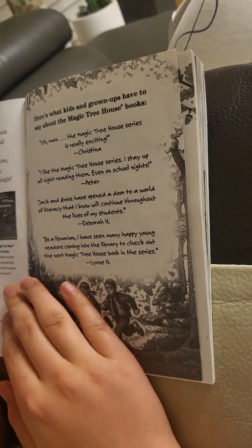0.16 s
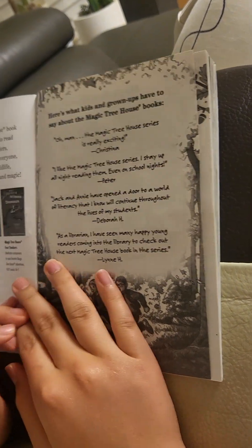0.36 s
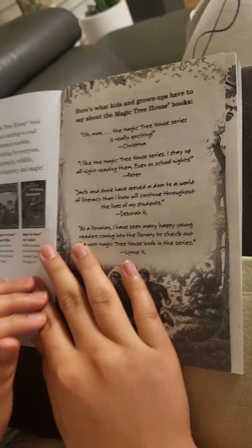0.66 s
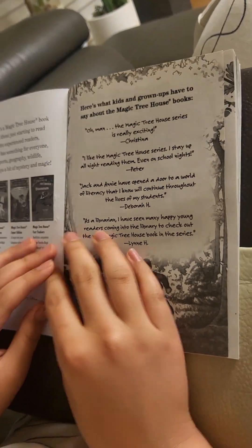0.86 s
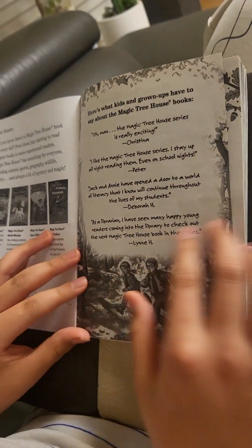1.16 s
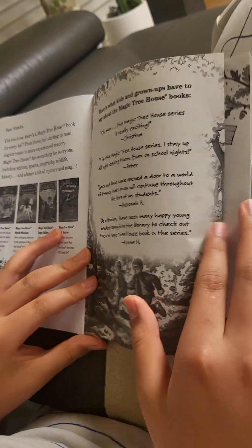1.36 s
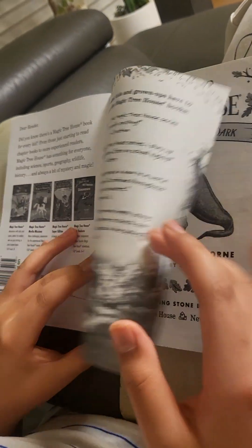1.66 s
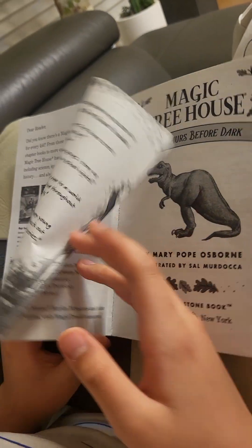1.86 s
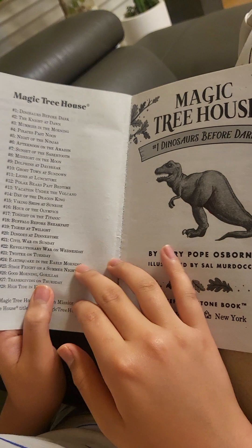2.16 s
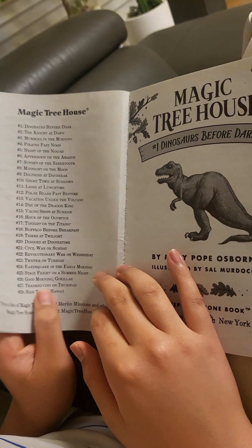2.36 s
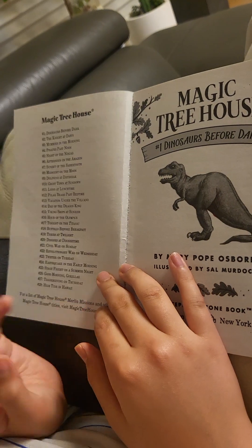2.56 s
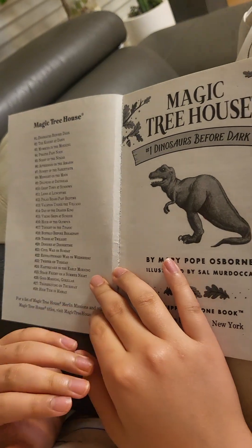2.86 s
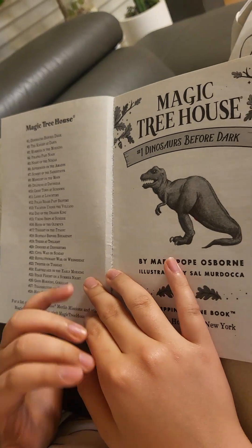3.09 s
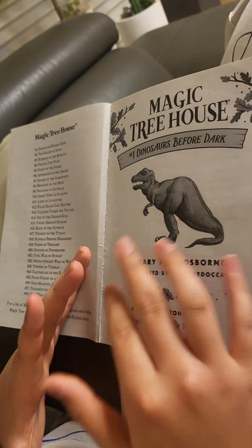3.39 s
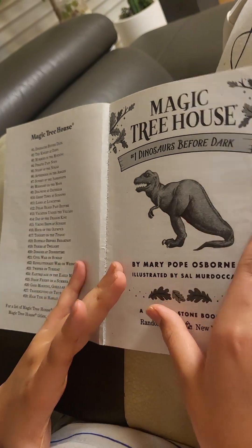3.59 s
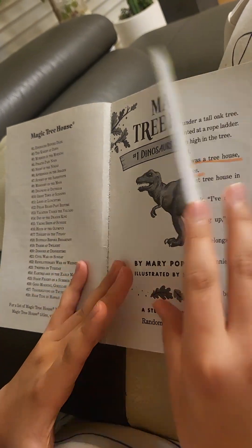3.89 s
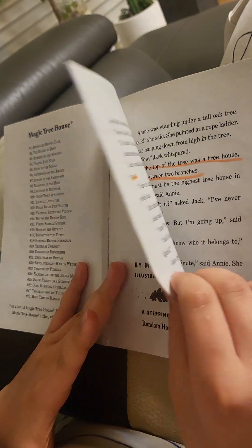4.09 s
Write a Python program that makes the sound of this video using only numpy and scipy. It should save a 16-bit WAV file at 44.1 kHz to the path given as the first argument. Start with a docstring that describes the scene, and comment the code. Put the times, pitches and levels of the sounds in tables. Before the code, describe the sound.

Hands smooth a paperback with dry papery rubs, then turn a page with crisp crackles and snaps, over a faint low hum.

```python
"""Paperback and turning page

Hands smooth a paperback on a sofa, close by, and turn a page; a second page starts to lift at the end.
Strokes are filtered noise: low skin drag, sheet rub, dry hiss. Snaps are short noise cracks, buckles grainy runs,
bumps decaying sines with a dull puff. Lap friction and fingertip touches are noise and thuds.
A wavering sine hums over faint air noise; snaps, buckles and bumps get a short room tail."""
import sys
import numpy as np
from scipy import signal
from scipy.fft import rfft, irfft, next_fast_len
from scipy.io import wavfile
from scipy.ndimage import map_coordinates

SR = 44100
rng = np.random.default_rng(int(sys.argv[2]) if len(sys.argv) > 2 else 0)


def waveform_to_disk(signal):
    """Save audio, clipped to [-1, 1], as 16-bit WAV at the path in sys.argv[1]."""
    frames = np.transpose(np.atleast_2d(signal))
    scaled = np.clip(frames, -1, 1) * 32767
    samples = np.round(scaled).astype(np.int16)
    wavfile.write(sys.argv[1], SR, samples)


N = 186631

# All levels are gains before panning.
# sliding strokes: start_s, push_s, coast_t60_s, rub_db, hiss_over_rub_db
STROKES = [(0.333, 0.023, 0.15, -51.5, 6.5), (.438, 0.038, 0.67, -33.5, -3.5), (0.62, .034, 0.85, -47, -9),
           (.771, 0.1, 2.2, -57, 7), (.968, 0.18, .33, -52.5, 5), (1.221, 0.048, 0.11, -58.5, 9.5),
           (1.339, 0.063, 0.32, -42.5, -1), (1.439, 0.039, 0.76, -33, -0.5), (1.716, 0.039, .36, -47.5, 5),
           (1.871, 0.06, 1.3, -51.5, 5), (1.907, 0.018, 0.38, -45.5, 9), (2.079, 0.064, 0.47, -51, 3),
           (2.14, 0.12, 1.9, -44.5, 5), (2.492, 0.019, 0.66, -35.5, -3), (2.633, 0.035, 2.1, -44, -2),
           (2.739, 0.053, .33, -48, 8), (2.833, 0.03, 0.31, -43, 3), (2.974, 0.082, 0.57, -47.5, -5),
           (3.19, 0.15, 0.24, -51.5, -2.5), (3.29, 0.047, 0.46, -42, -1.5), (3.415, 0.1, 0.74, -49.5, -1.5),
           (3.594, 0.02, 0.47, -44.5, 2.5), (3.884, 0.025, 1.4, -44, -3.5), (3.93, 0.14, 1.6, -47, -2),
           (4.145, 0.042, 0.24, -62, 15.5)]
# book shifting in the lap: time_s, level_db
HANDLING = [(0.0, -38), (0.14, -44.5), (1.38, -54), (2.06, -46), (2.34, -47), (2.83, -57.5), (3.29, -53.5),
            (3.55, -59.5), (4.23, -55.5)]
# sheet snaps and nail ticks: start_s, face_db, edge_db, face_pitch_hz
SNAPS = [(.0144, -25.5, -44, 1190), (0.0446, -30.5, -33, 2370), (.126, -32, -34.5, 1600),
         (0.142, -39, -39, 2160), (.1503, -40, -54, 875), (.1966, -44, -49, 2400), (0.415, -54, -45, 2000),
         (.43, -37.5, -32.5, 2260), (0.857, -34.5, -29.5, 2320), (1.3439, -33.5, -31, 2510),
         (1.444, -26, -32, 3260), (1.7312, -42, -40, 2250), (1.825, -25.5, -62, 1870),
         (1.85, -15.5, -12, 2260), (1.965, -21, -25, 2980), (1.9981, -17.5, -21.5, 1960),
         (2.108, -39, -37.5, 2040), (2.147, -28.5, -56, 1300), (2.1993, -17.5, -34, 1470),
         (2.2764, -28, -30, 1280), (2.3096, -15.5, -8.5, 1380), (2.3367, -12.5, -13.5, 1760),
         (3.2003, -47.5, -59, 1390), (3.2277, -42, -45, 1470), (4.0899, -30, -49, 1780)]
# runs of tiny creases: peak_s, level_db, swell_length_s, face_pitch_hz
BUCKLES = [(0.048, -29.5, 0.095, 1020), (.086, -36, 0.056, 1970), (0.14, -40.5, 0.14, 850),
           (1.752, -42, 0.043, 1070), (1.854, -15.5, 0.053, 2920), (1.954, -21, 0.13, 2230),
           (1.998, -27, 0.061, 1760), (2.311, -35, 0.17, 1180), (2.34, -25.5, 0.066, 1960)]
# soft blows on the page block: start_s, level_db, pitch_hz
BUMPS = [(.0373, -21, 660), (0.05, -20.5, 168), (.078, -28.5, 195), (0.1168, -23, 600), (.144, -24.5, 218),
         (.1496, -21, 840), (0.445, -28.5, 202), (.552, -31, 169), (.674, -35, 322), (0.7, -36.5, 350),
         (.856, -30, 231), (1.195, -41, 186), (1.335, -31, 338), (1.3438, -31.5, 189), (1.392, -31.5, 210),
         (1.442, -32, 204), (1.73, -29, 189), (1.851, -29, 262), (1.953, -26.5, 312), (1.968, -20, 166),
         (2.109, -30.5, 150), (2.146, -36, 202), (2.284, -29, 242), (2.316, -26.5, 173), (3.229, -40, 306)]
# hum drift: time_s, level_db
HUM_DRIFT = [(0.2, -51.5), (0.35, -50.5), (1.55, -46), (1.89, -51.5), (2.86, -49.5), (4.15, -52.5)]

# skin drag spectrum: freq_hz, relative_db
DRAG_SPECTRUM = [(200, -18), (450, -2), (900, 0), (1300, -1), (2000, -18), (4000, -60)]
# sheet-on-sheet rub spectrum: pitch_multiple, relative_db
RUB_SHAPE = [(.3, -28.5), (.55, -6.5), (.8, 0), (1.1, 2.5), (1.5, -4.5), (2, -5.5), (2.7, -10), (4, -41)]
# fibre hiss spectrum before tilt: freq_hz, relative_db
HISS_SPECTRUM = [(3000, -7), (5000, -10), (6000, -1), (7600, 2), (9000, -1), (10500, 0.5), (12300, -2),
                 (14000, -3), (16000, -3.5)]
# snap face spectrum: pitch_multiple, relative_db
SNAP_FACE_SHAPE = [(.12, -26), (.45, -1), (1, 5.5), (1.4, 3), (2, -11), (3.2, -16), (4.6, -26), (9, -13)]
# snap edge spectrum: freq_hz, relative_db
SNAP_EDGE_SPECTRUM = [(2500, -15), (5000, 1), (6200, -4), (7300, 2.5), (8700, 5), (10500, -7.5),
                      (12500, 1.5), (13800, -11), (14800, -1), (16000, -14)]
# crease face spectrum: pitch_multiple, relative_db
CREASE_FACE_SHAPE = [(.08, -32), (.27, -3.5), (.6, -4.5), (1, -0.5), (1.5, -3.5), (2, -8.5), (2.7, -16.5),
                     (5, -19)]
# crease edge spectrum: freq_hz, relative_db
CREASE_EDGE_SPECTRUM = [(2500, -37), (5000, -6), (6200, -28), (7200, 17), (8600, 4), (10500, 4.5),
                        (12500, -2), (14000, -22), (16000, -11)]
# lap friction spectrum: freq_hz, relative_db
LAP_SPECTRUM = [(25, -48), (60, 4), (110, -2), (190, -1.5), (300, -5), (450, -12.5), (900, -21),
                (3000, -90)]
# room air spectrum: freq_hz, relative_db
AIR_SPECTRUM = [(20, -53), (45, 0), (65, -21), (90, -10), (200, -3.5), (500, -21.5), (2000, -17),
                (6000, -23.5), (16000, -30)]
# rumble around the hum: freq_hz, relative_db
RUMBLE_SPECTRUM = [(60, -22), (100, -16.5), (116, -27), (128, 15), (145, -4), (240, -30)]
# room decay: freq_hz, t60_s
ROOM_DECAY = [(150, 0.066), (1000, 0.46), (4000, 0.33), (14000, 0.045)]
# open-book resonances: freq_hz, width_hz, gain_db
BOOK_MODES = [(734, 14, -4), (1450, 180, -12), (1860, 19, -25), (2477, 28, -10), (3650, 27, -5),
              (4080, 130, -12), (4465, 46, -2.5), (4860, 77, -3.5), (8570, 130, -14), (12140, 350, -8.5)]
# likeness of the two microphone ports, small close source: freq_hz, correlation
SPOT = [(60, 0.79), (250, 0.97), (600, 0.7), (950, 1), (1250, -0.045), (1800, -0.057), (2400, -0.1),
        (3400, -0.12), (4600, 0.91), (6000, 0.1), (16000, 0.23)]
# likeness of the two microphone ports, broad surface: freq_hz, correlation
BROAD = [(300, 0.97), (520, -0.29), (800, 0.67), (1000, 0.12), (1400, -0.32), (2100, -0.11), (2600, 0.063),
         (3800, -0.023), (8000, -0.02)]

HUM_HZ, HUM_WAVER_DB = 119.8, 1.3
TOUCHES_PER_S, TOUCH_DB, TOUCH_SCATTER_DB, TOUCH_HZ = 6.4, 4.5, 3, 254  # level over the shifting
# snap decay at HARD_SNAP_DB; doubles for each SNAP_DOUBLING_DB softer
SNAP_T60_S, HARD_SNAP_DB, SNAP_DOUBLING_DB = 0.011, -14, 18.5
JOLT_DB, JOLT_HZ, JOLT_T60_S = -13.5, 474, 0.075  # level over the snap's face
LEAN_DB, EDGE_LEAN_DB = 7, 12.5  # right over left: book lies right, its edge closest
BUMP_CYCLES = 12.9  # puff t60 in cycles
BUILD_SHARE = 0.42  # part of a run's swell before its peak
CREASES_PER_S, CREASE_DB, CREASE_DECAY_S = 240, 0.5, 0.0006  # bigger creases
GRAIN_PEAK_CAP = 2.7  # multiple of rms, keeps the crackle even
QUICK_RUN_S, CRISP_DB, CRISP_DB_PER_DOUBLING = 0.041, -9.5, -18  # edge over face; longer runs are duller
FLUTTER_DELAY_S, FLUTTER_DB, FLUTTER_S, FLUTTER_PITCH_RATIO = 0.019, -18, 0.13, 0.52
GRIP_SHARE = 0.45  # part of a push spent gathering speed
SNAGS_PER_S, SNAG_DB, SNAG_DECAY_S = 45, 2, 0.00064  # coarse fibres
TURN_S = 2.1  # page has turned
DRAG_BEFORE_DB, DRAG_AFTER_DB = -7.5, -12.5  # over the rub: page on top grips more before the turn
RUB_HZ, RUB_OCTAVES_PER_DB = 2500, 0.08  # lighter, hissier touch rubs higher
ROLLOFF_START_HZ = 15850


def amp(db):
    """Decibels to gain."""
    return 10 ** (np.asarray(db) / 20)


def unit(x):
    """Scale to rms 1."""
    return x / np.sqrt(np.mean(x ** 2) + 1e-20)


def along(points, hz):
    """Interpolate (freq_hz, value) points on a log frequency axis."""
    f, v = np.transpose(points)
    return np.interp(np.log(hz + 1), np.log(f), v)


def drift(rows):
    """Interpolate (time_s, value) rows at every sample."""
    time_s, value = np.transpose(rows)
    return np.interp(np.arange(N) / SR, time_s, value)


def wobble(knots_per_s):
    """Smooth random curve through Gaussian knots."""
    knots = rng.standard_normal(int(N * knots_per_s / SR) + 4)
    return map_coordinates(knots, [np.arange(N) * knots_per_s / SR])


def coloured(x, spectrum):
    """Minimum-phase filter with the given spectrum."""
    n = x.shape[-1]
    m = 2 * next_fast_len(n // 2 + 2048, True)
    cepstrum = irfft(np.log(amp(along(spectrum, np.fft.rfftfreq(m, 1 / SR)))))
    # fold onto positive times: causal response
    cepstrum[1:m // 2] *= 2
    cepstrum[m // 2 + 1:] = 0
    return irfft(rfft(x, m) * np.exp(rfft(cepstrum)), m)[..., :n]


def pair(alike, size):
    """White noise at two ports with frequency-dependent correlation."""
    m = next_fast_len(size, True)
    common, opposed = rfft(rng.standard_normal((2, m)))
    correlation = np.clip(along(alike, np.fft.rfftfreq(m, 1 / SR)), -1, 1)
    angle = np.arccos(correlation) / 2
    both = np.cos(angle) * common + np.sin(angle) * np.array([opposed, -opposed])
    return irfft(both, m)[:, :size]


def panned(x, right_db):
    """Raise right over left by right_db, split evenly."""
    return x * amp([[-right_db / 2], [right_db / 2]])


def burst(envelope, spectrum, alike):
    """Filtered noise under an envelope, at the envelope's rms."""
    noise = coloured(envelope * pair(alike, len(envelope)), spectrum)
    return unit(noise) * np.sqrt(np.mean(envelope ** 2))


def dying(t, t60_s):
    """Exponential decay, 60 dB in t60_s."""
    return np.exp(-np.log(1000) * t / max(t60_s, 1e-3))


def pitched(shape, hz):
    """Place a spectrum shape at a pitch."""
    return [(multiple * hz, db) for multiple, db in shape]


def tilted(spectrum, db_per_octave):
    """Tilt a spectrum about its lowest point."""
    return [(hz, db + db_per_octave * np.log2(hz / spectrum[0][0])) for hz, db in spectrum]


def catches(t, grain_db, size):
    """Fibres catch and slip: strength jumps every size samples."""
    steps_db = grain_db * rng.standard_normal(len(t) // size + 1)
    return unit(amp(np.repeat(steps_db, size)[:len(t)]))


def spikes(t, per_s, db, decay_s):
    """Unit gain with brief decaying jumps at random moments."""
    hits = rng.random(len(t)) < per_s / SR
    jump = np.exp(-np.arange(SR // 200) / SR / max(decay_s, 1e-4))
    return 1 + (amp(db) - 1) * np.convolve(hits, jump)[:len(t)]


def add(track, start_s, sound):
    """Mix a sound into the track, trimmed at both ends."""
    start = round(start_s * SR)
    part = sound[:, max(-start, 0):max(N - start, 0)]
    track[:, max(start, 0):][:, :part.shape[1]] += part


def thud(hz, puff_t60_s):
    """Push on the damped page block: a few sine cycles and a dull noise puff."""
    t = np.arange(SR // 5) / SR
    push = dying(t, puff_t60_s) * (1 - np.exp(-t / 0.0014))
    dull = [(hz / 8, -20), (hz / 1.96, -4), (hz, 0), (2 * hz, -8), (4 * hz, -24), (20 * hz, -65)]
    ring = 1.18 * dying(t, 7 / hz) * np.sin(2 * np.pi * hz * t)
    return ring + 0.6 * burst(push, dull, SPOT)


def background():
    """Mains hum wavering in a narrow rumble, over still room air."""
    phase = 2 * np.pi * HUM_HZ * np.arange(N) / SR + 0.069 * wobble(4.3)
    line = np.sqrt(2) * np.sin(phase)
    rumble = unit(coloured(pair(SPOT, N), RUMBLE_SPECTRUM))
    level_db = drift(HUM_DRIFT) + HUM_WAVER_DB * wobble(6.4)
    hum = amp(level_db) * unit(line + 0.5 * rumble)
    air = amp(-55.5) * unit(coloured(pair(BROAD, N), AIR_SPECTRUM))
    return panned(hum + air, right_db=2.5)


def handling():
    """Book and sleeves shift unevenly on the lap as low friction noise; fingertips land as thuds."""
    uneven = pair(SPOT, N) * amp(2 * wobble(81))
    shifting = unit(coloured(uneven, LAP_SPECTRUM))
    touches = np.zeros((2, N))
    for k in range(int(TOUCHES_PER_S * N / SR)):
        strength, pitch = rng.standard_normal(2)
        hz = TOUCH_HZ * np.exp(0.25 * pitch)
        touch = amp(TOUCH_DB + TOUCH_SCATTER_DB * strength) * thud(hz, BUMP_CYCLES / hz)
        add(touches, (k + rng.random()) / TOUCHES_PER_S, touch)
    return panned(amp(drift(HANDLING)) * (shifting + touches), right_db=3.0)


def snaps():
    """The sheet pops through: a bright edge tick and a slightly longer face crack."""
    out, t = np.zeros((2, N)), np.arange(SR // 8) / SR
    for start_s, face_db, edge_db, hz in SNAPS:
        t60_s = SNAP_T60_S * 2 ** ((HARD_SNAP_DB - face_db) / SNAP_DOUBLING_DB)
        pop = np.tanh(1.14 * dying(t, t60_s))  # the crease takes a moment to pass
        face = amp(face_db) * burst(pop, pitched(SNAP_FACE_SHAPE, hz), SPOT)
        edge = amp(edge_db) * burst(pop ** 2.26, SNAP_EDGE_SPECTRUM, SPOT)
        add(out, start_s, panned(face, right_db=LEAN_DB) + panned(edge, right_db=EDGE_LEAN_DB))
    return out


def bumps():
    """Fingers and the falling page push the page block; each snap jolts it."""
    out = np.zeros((2, N))
    for start_s, db, hz in BUMPS:
        add(out, start_s, amp(db) * thud(hz, BUMP_CYCLES / hz))
    for start_s, face_db, _, _ in SNAPS:
        jolt_hz = JOLT_HZ * np.exp(0.1 * rng.standard_normal())
        add(out, start_s, amp(face_db + JOLT_DB) * thud(jolt_hz, JOLT_T60_S))
    return panned(out, right_db=5.0)


def creasing(t, length_s):
    """Strength of a grainy crease run centred on t = 0."""
    rise = dying(np.maximum(-t, 0), BUILD_SHARE * length_s)
    fall = dying(np.maximum(t, 0), (1 - BUILD_SHARE) * length_s)
    grain = catches(t, grain_db=3.5, size=30) * spikes(t, CREASES_PER_S, CREASE_DB, CREASE_DECAY_S)
    grain = unit(np.minimum(unit(grain), GRAIN_PEAK_CAP))
    return np.tanh(2.2 * rise * fall) * grain  # holds its strength while the bend travels


def buckles():
    """A bend crosses the sheet: creases swell and thin out, then it relaxes in a duller flutter."""
    out, t = np.zeros((2, N)), np.arange(-SR // 10, SR // 5) / SR
    for peak_s, db, length_s, hz in BUCKLES:
        creases = creasing(t, length_s)
        face = burst(creases, pitched(CREASE_FACE_SHAPE, hz), SPOT)
        edge_db = CRISP_DB + CRISP_DB_PER_DOUBLING * np.log2(length_s / QUICK_RUN_S)
        edge = amp(edge_db) * burst(creases, CREASE_EDGE_SPECTRUM, SPOT)
        relaxing = creasing(t - FLUTTER_DELAY_S, FLUTTER_S)
        flutter_shape = pitched(CREASE_FACE_SHAPE, FLUTTER_PITCH_RATIO * hz)
        flutter = amp(FLUTTER_DB) * burst(relaxing, flutter_shape, SPOT)
        lean_db = along([(800, 2.3), (2500, 4.0)], hz)
        run = panned(face + flutter, right_db=lean_db) + panned(edge, right_db=EDGE_LEAN_DB)
        add(out, peak_s + t[0], amp(db) * run)
    return out


def sliding():
    """Strokes grip, run on and coast, 1 s at most: skin drags low, sheets rub, fibres hiss."""
    out, t = np.zeros((2, N)), np.arange(SR) / SR
    for start_s, push_s, t60_s, rub_db, hiss_db in STROKES:
        grip = np.clip(t / max(GRIP_SHARE * push_s, 1e-3), 0, 1) ** 2
        speed = grip * dying(np.maximum(t - push_s, 0), t60_s)
        speed = speed * catches(t, grain_db=0.98, size=260) * spikes(t, SNAGS_PER_S, SNAG_DB, SNAG_DECAY_S)

        drag_db = DRAG_BEFORE_DB if start_s < TURN_S else DRAG_AFTER_DB
        drag = amp(drag_db) * burst(speed * catches(t, grain_db=2.5, size=150), DRAG_SPECTRUM, BROAD)

        rub_hz = RUB_HZ * 2 ** (RUB_OCTAVES_PER_DB * hiss_db)
        rub = burst(speed * catches(t, grain_db=0.06, size=48), pitched(RUB_SHAPE, rub_hz), BROAD)

        fibres = tilted(HISS_SPECTRUM, 0.67 * np.clip(hiss_db, -6, 5))  # light touch hisses higher
        hiss = amp(hiss_db) * burst(speed * catches(t, grain_db=1.0, size=24), fibres, BROAD)

        stroke = panned(drag, right_db=2.5) + panned(rub, right_db=4.0) + panned(hiss, right_db=4.5)
        add(out, start_s, amp(rub_db) * stroke)
    return out


def book(x):
    """Open pages and the air wedge between them ring: resonances added to the direct sound."""
    m = next_fast_len(N + SR // 4, True)
    f = np.fft.rfftfreq(m, 1 / SR)
    ring = sum(amp(db) * 1j * f * w / (hz * hz - f * f + 1j * f * w) for hz, w, db in BOOK_MODES)
    return irfft(rfft(x, m) * (1 + ring), m)[:, :N]


def room(x):
    """Short diffuse noise tail, different at each port; each frequency dies at its own rate."""
    hz, t, z = signal.stft(rng.standard_normal((2, SR // 2)), SR, nperseg=256)
    decay = amp(-60 * t / along(ROOM_DECAY, hz)[:, None])
    tail = signal.istft(z * decay, SR, nperseg=256)[1]
    tail = np.pad(tail / np.linalg.norm(tail[0]), ((0, 0), (180, 0)))  # 4 ms predelay
    return signal.fftconvolve(x, tail, axes=1)[:, :N]


def scene():
    """Paper and hands close by, in the humming room."""
    blows = book(snaps() + buckles()) + bumps()
    return blows + amp(-14.5) * room(blows) + book(sliding()) + handling() + background()


def record(dry):
    """Recorder band limit: falls 0.1 dB per Hz above the rolloff start, down to -100 dB."""
    m = next_fast_len(N + SR // 4)
    above_hz = np.fft.rfftfreq(m, 1 / SR) - ROLLOFF_START_HZ
    return irfft(rfft(dry, m) * amp(-np.clip(above_hz / 10, 0, 100)), m)[:, :N]


dry = scene()
out = record(dry)
waveform_to_disk(out)
```